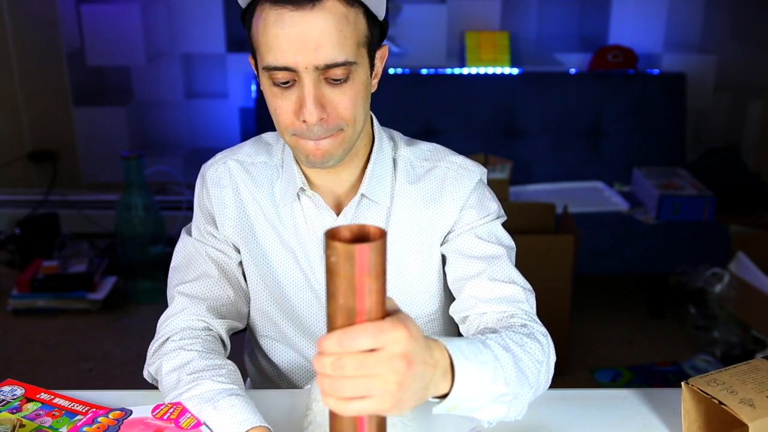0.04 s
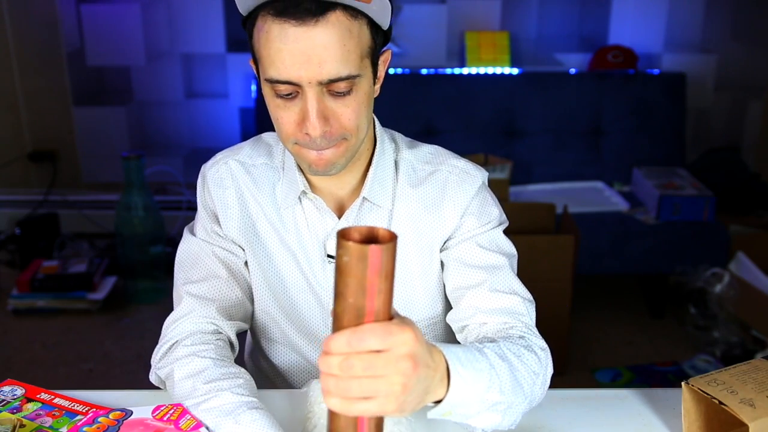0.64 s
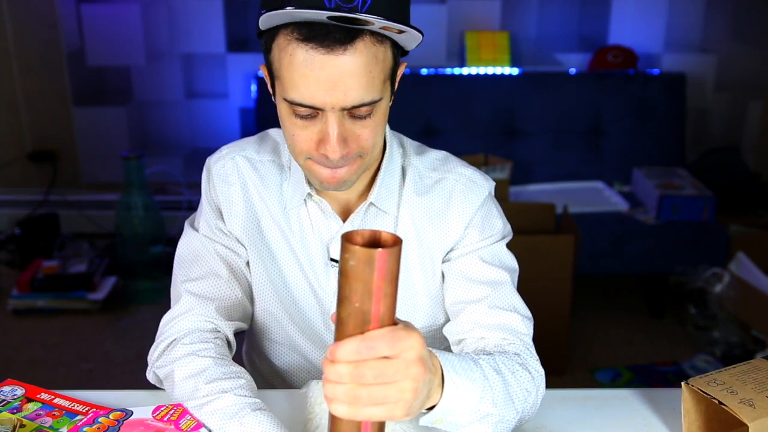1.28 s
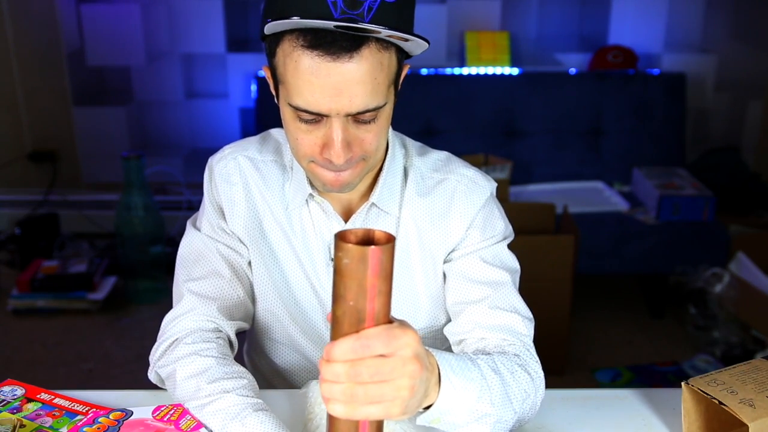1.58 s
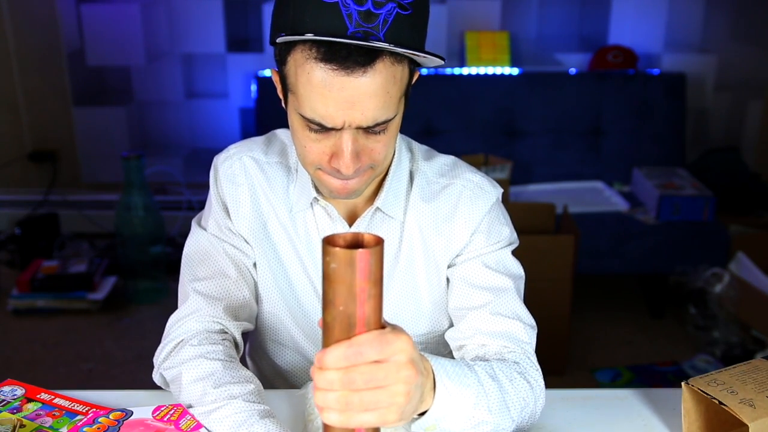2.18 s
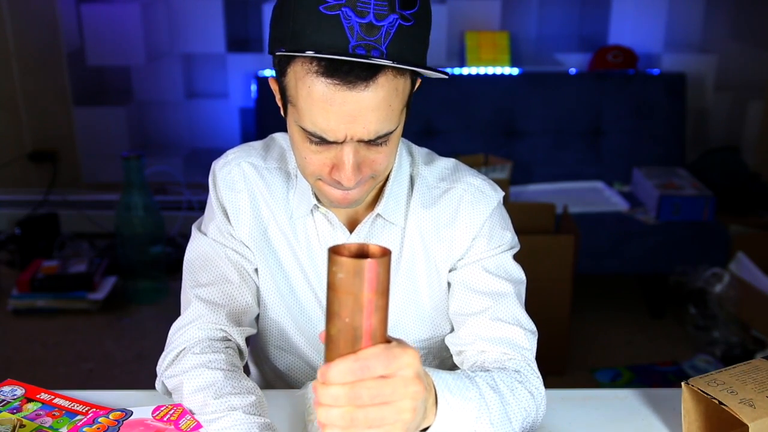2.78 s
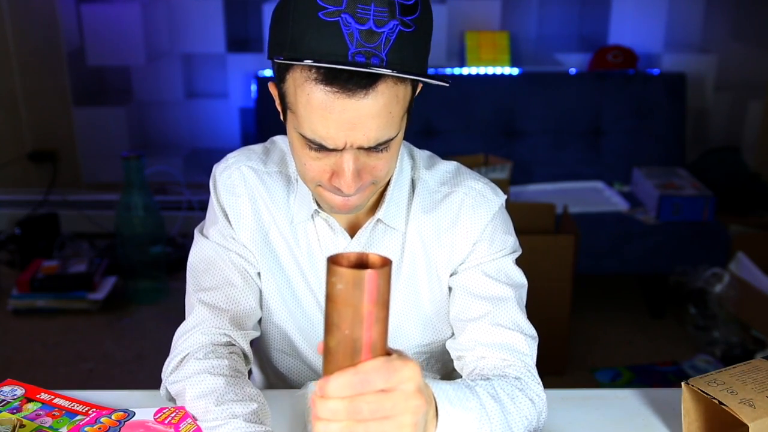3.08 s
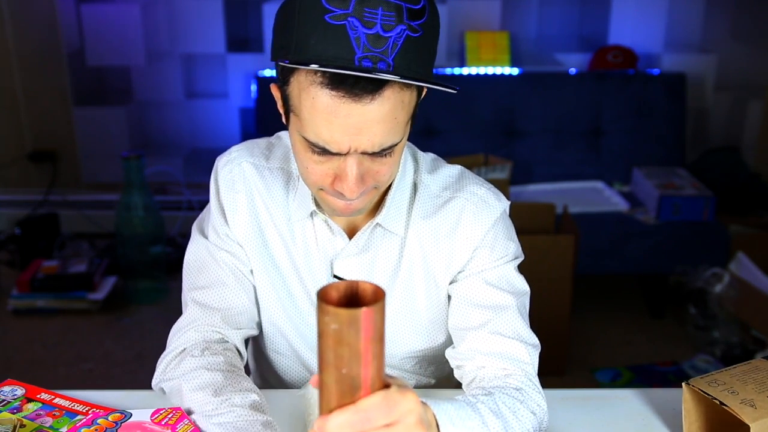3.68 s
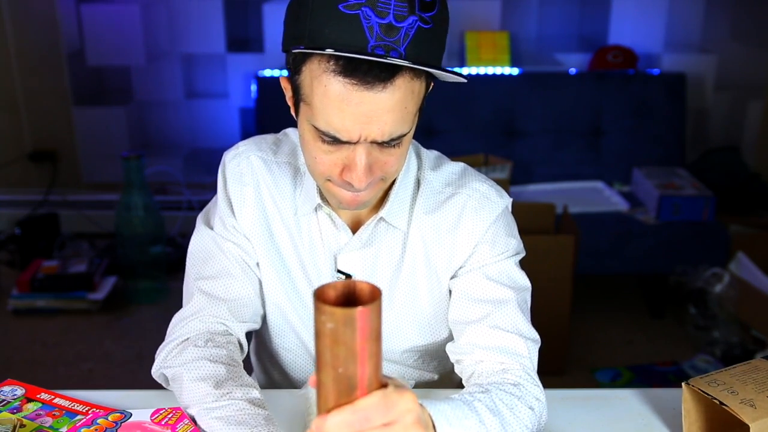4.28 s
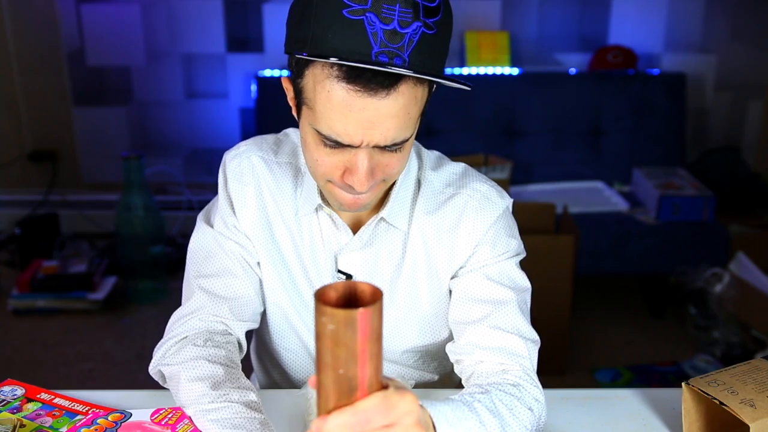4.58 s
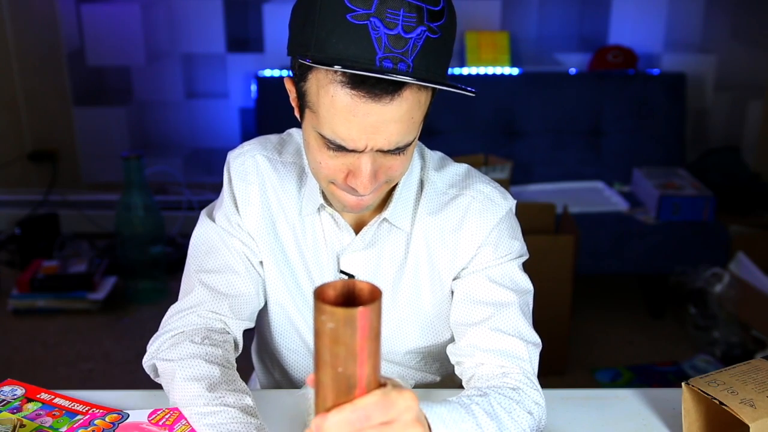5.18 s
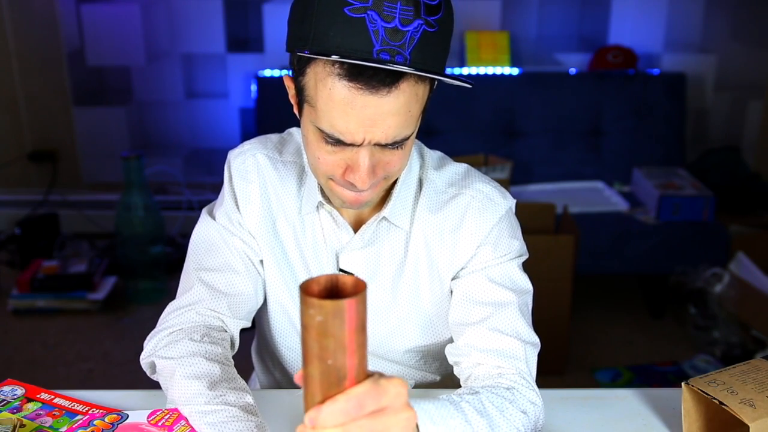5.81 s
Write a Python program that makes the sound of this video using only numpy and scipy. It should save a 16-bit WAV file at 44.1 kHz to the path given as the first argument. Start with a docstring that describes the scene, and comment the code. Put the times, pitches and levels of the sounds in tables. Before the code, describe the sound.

Right at the start, magnets clink against a copper tube and bump the table with a brief hollow note. Light finger ticks and knocks follow, with short rim scrapes and a sleeve brushing the tabletop around 0.6 seconds. Faint ticks thin out until a small scrape, knocks and ticks at about 2.2 seconds. From 2.5 seconds a hand slides softly down the tube in surges. Just after 3.2 seconds the magnets clink again and slam onto the table with a sharp clack and heavy thump, the loudest moment, quickly rocking to rest. A bright tick and sleeve rustle come near 3.75 seconds. From 3.9 to 4.4 seconds the tilting rim creaks, scrapes and knocks. Soft knocks and sleeve strokes die away by 6 seconds. Everything is close to one microphone in a small furnished room, with short reverberation, faint finger rubbing and quiet ventilation.

```python
"""Strong magnets clink on an upright, hand-held copper tube and bump the table, close to one microphone.
Fingers tick and knock, the rim scrapes, sleeves brush the tabletop, and a sleeve slides along the table in
surges. Just after 3.2 s the magnets clink again, slam onto the table and rock to rest. The grip then creaks on
the tube, the rim scrapes as it tilts, and the last soft knocks and sleeve strokes die away. Throughout, the
gripping fingers fidget over faint ventilation, and a small furnished room answers each contact."""
import sys
import numpy as np
from scipy import signal
from scipy.fft import rfft, irfft, next_fast_len
from scipy.io import wavfile
from scipy.ndimage import uniform_filter1d

SR = 44100
rng = np.random.default_rng(int(sys.argv[2]) if len(sys.argv) > 2 else 0)


def dump_mix(stems):
    """Bounce the given channels to the path in sys.argv[1] as a 16-bit WAV at rate SR."""
    frames = np.atleast_2d(stems).T  # one column per channel
    limited = np.clip(frames, -1, 1)  # hard clip at full scale
    pcm = np.round(limited * 32767).astype(np.int16)
    wavfile.write(sys.argv[1], SR, pcm)


N = 266805
T = np.arange(SR // 2) / SR  # time since a contact [s]

# modes of the tube wall: (frequency [Hz], relative level [dB], t60 [s])
COPPER_MODES = [(1750, -10, .07), (2310, -11, .08), (2365, -19, .28), (2660, -10, .11), (2900, -17, .1),
                (3160, -13, .06), (3960, 0, .035), (4037, -11, .09), (4472, -7, .06), (5050, -12, .06),
                (5440, -7, .035), (5640, -13, .04), (6420, -10, .035), (6660, -10, .035), (7150, -14, .03),
                (8090, -8, .05), (8460, -8, .035), (8730, -12, .03), (9470, -13, .035), (10800, -14, .035),
                (11300, -18, .03), (11820, -18, .05), (12420, -14, .03), (12800, -19, .03),
                (13400, -19, .04), (13900, -19, .03)]


def amp(db):
    """Decibels to gain."""
    return 10 ** (np.asarray(db) / 20)


def unit(x):
    """Scale to rms 1."""
    return x / np.sqrt(np.mean(x ** 2) + 1e-20)


def along(points, hz):
    """Read a curve of (frequency [Hz], value) points on a log frequency axis."""
    freqs, values = np.transpose(points)
    return np.interp(np.log(hz + 1), np.log(freqs + 1), values)


def filtered(x, response):
    """Filter x by a response given as a function of frequency."""
    size = next_fast_len(len(x) + 8192)
    return irfft(rfft(x, size) * response(np.fft.rfftfreq(size, 1 / SR)), size)[:len(x)]


def coloured(x, spectrum, scale=1):
    """Shape x with an EQ curve, shifted in pitch by scale; the result has rms 1."""
    return unit(filtered(x, lambda hz: amp(along(spectrum, hz / scale))))


def grains(size, share):
    """Friction grain: in a small share of all samples a tiny catch lets go."""
    return rng.standard_normal(size) * (rng.random(size) < share)


def fade(t60, hold=0):
    """Steady for hold seconds, then dying by 60 dB in t60."""
    return np.exp(-np.log(1000) * np.maximum(T - hold, 0) / t60)


def rise(seconds):
    """A soft attack with this time constant."""
    return 1 - np.exp(-T / seconds)


def tone(hz, t60):
    """One struck resonance."""
    return np.sin(2 * np.pi * hz * T) * fade(t60)


def ring(modes, scatter_db, hold=0):
    """Struck modes, starting at rms 1; every contact point feeds them a little differently."""
    hz, db, t60 = np.transpose(modes)
    gain = amp(db + scatter_db * rng.standard_normal(len(hz)))
    waves = np.sin(2 * np.pi * (hz[:, None] * T + rng.random((len(hz), 1))))
    return gain @ (waves * fade(t60[:, None], hold)) / np.sqrt(np.sum(gain ** 2) / 2)


def burst(centre_hz, q, t60):
    """A brief contact: noise through the same broad band-pass twice."""
    def band(hz):
        damping = 1j * hz * centre_hz / q
        return damping / (centre_hz ** 2 - hz ** 2 + damping)
    return unit(filtered(rng.standard_normal(len(T)), lambda hz: band(hz) ** 2)) * fade(t60)


def add(track, s, sound):
    """Mix a sound in at s seconds."""
    part = track[round(s * SR):][:len(sound)]
    part += sound[:len(part)]


def in_room(sound, wet_db):
    """A contact plus the room's short, diffuse tail; the top treble dies first."""
    # reverb decay: (frequency [Hz], t60 [s])
    decay = [(100, .36), (400, 0.23), (1500, 0.33), (4000, 0.34), (8000, 0.29), (15000, 0.14)]
    hz, t, spectra = signal.stft(rng.standard_normal(len(T)), SR, nperseg=256)
    dying = spectra * np.exp(-np.log(1000) * t / along(decay, hz)[:, None])
    tail = signal.istft(dying, SR, nperseg=256)[1][:len(T)] * rise(0.0013)
    return sound + amp(wet_db) * signal.fftconvolve(sound, tail / np.linalg.norm(tail))[:len(sound)]


def room_tone():
    """A quiet bed of ventilation noise and microphone hiss."""
    # colour of the bed: (frequency [Hz], relative level [dB])
    air_eq = [(20, -12), (45, -1), (120, 0), (250, -5.5), (520, -2.5), (620, -12.5), (810, -7), (1050, -15),
              (1600, -19), (2400, -23.5), (6000, -26), (12000, -27), (15800, -36.5)]
    return amp(-63) * coloured(rng.standard_normal(N), air_eq)


def friction(drive, rub_db, hiss_db):
    """Sliding contact: a grainy rub through the table, a scratchy hiss of threads, a faint copper ring."""
    # dull body of the rub: (frequency [Hz], relative level [dB])
    rub_eq = [(40, -2.5), (110, -1.5), (220, 0), (420, 2), (800, -2), (1300, -10), (2000, -16), (3500, -34),
              (9000, -41)]
    # bright hiss of the threads: (frequency [Hz], relative level [dB])
    hiss_eq = [(900, -2), (1900, 4), (2700, -3), (3800, 0), (4600, -1.5), (8000, -1), (12000, -4.5),
               (15500, -9.5)]
    snags_per_s, snag_db, wall_db = 61, -13, -78.5
    size = len(drive)
    rub = coloured(grains(size, share=.08), rub_eq)
    catching = amp(1.5 * unit(uniform_filter1d(rng.standard_normal(size), size=150)))
    snags = unit(grains(size, share=snags_per_s / SR))  # threads that catch and let go
    threads = unit(grains(size, share=0.41) * catching)
    hiss = coloured(threads + amp(snag_db) * snags, hiss_eq)
    wall = unit(signal.fftconvolve(hiss, ring(COPPER_MODES, scatter_db=1.5))[:size])
    return drive * (amp(rub_db) * rub + amp(hiss_db) * hiss + amp(wall_db) * wall)


def fidgets():
    """The grip is never quite still: faint, short finger strokes at chance moments."""
    strokes_per_s, length_s = 13, .1
    speed = np.zeros(N)
    swell = np.hanning(round(length_s * SR))
    for k, (delay, strength) in enumerate(rng.random((int(strokes_per_s * N / SR), 2))):
        add(speed, (k + delay) / strokes_per_s, strength * swell)
    return friction(speed, rub_db=-62.5, hiss_db=-77.5)


def sleeves():
    """Sleeve and skin brush the table; each stroke swells and dies with the speed of the arm."""
    # arm strokes: (midpoint [s], length [s], rub level [dB], hiss level [dB])
    strokes = [(0.616, .33, -48, -50), (.843, .15, -53.5, -62), (1.083, .3, -62.5, -79.5),
               (2.065, 0.12, -58.5, -63), (2.219, 0.13, -49, -59.5), (2.396, .16, -52, -61),
               (3.697, 0.38, -50.5, -50), (3.816, .3, -51, -64), (4.251, .16, -47.5, -54),
               (4.363, .12, -55, -64), (4.488, 0.081, -54, -88), (4.96, 0.22, -55.5, -71),
               (5.486, 0.13, -55, -69.5), (5.747, 0.087, -62.5, -65.5), (5.906, .08, -70, -70.5)]
    out = np.zeros(N)
    for s, length, rub_db, hiss_db in strokes:
        speed = np.hanning(round(length * SR))
        add(out, s - length / 2, friction(speed, rub_db, hiss_db))
    return out


def sleeve_slide():
    """A sleeve slides along the table in surges as the elbow moves; rub and hiss both follow its pressure."""
    # pressure of the sleeve: (time [s], relative level [dB])
    surges = [(2.48, -16), (2.58, -3), (2.67, -6.5), (2.74, -2), (2.84, -7), (2.92, 0.5), (2.985, -6),
              (3.025, 1.5), (3.129, -3.5), (3.198, -9)]
    out = np.zeros(N)
    s, pressure_db = np.transpose(surges)
    pressure = amp(np.interp(np.arange(s[0], s[-1], 1 / SR), s, pressure_db))
    add(out, s[0], friction(pressure, rub_db=-52.5, hiss_db=-62))
    return out


def rim_scrapes():
    """The rim sticks and slips over the table at an uneven rate; every slip is a short rasp."""
    # drags of the rim: (time [s], hold [s], level [dB], pitch scale [ratio])
    drags = [(0.56, 0.029, -42, 1), (0.623, 0.014, -42, .85), (0.687, 0.014, -41.5, 1),
             (2.174, .069, -47, .7), (4.185, 0.013, -48.5, 1), (4.258, 0.022, -32, 1.0),
             (4.288, 0.034, -44, .7), (4.342, 0.028, -47, .85)]
    # colour of the rasp: (frequency [Hz], relative level [dB])
    grind_eq = [(60, -38), (200, -14.5), (500, 0), (850, -3.5), (1300, -9), (1950, -14.5), (2350, -26),
                (6000, -36.5), (15000, -49)]
    slips_per_s, bite_s = 190, 0.003  # slip rate at a pitch scale of 1
    out = np.zeros(N)
    for s, hold, db, scale in drags:
        unevenness = unit(uniform_filter1d(rng.standard_normal(len(T)), size=300))
        slip_phase = np.cumsum(slips_per_s * scale * np.exp(0.28 * unevenness)) / SR % 1
        rasp = coloured(rng.standard_normal(len(T)) * np.exp(-1.5 * slip_phase), grind_eq, scale)
        add(out, s, amp(db) * in_room(rasp * rise(bite_s) * fade(0.047, hold), wet_db=-6))
    return out


def ticks():
    """Magnets and fingernails touch down hard: tiny, bright bursts of noise."""
    # hard touches: (time [s], level [dB], pitch [Hz])
    touches = [(.239, -44, 1720), (0.6943, -37.5, 4600), (0.7, -35, 6900), (0.7764, -51, 5600),
               (0.9539, -48.5, 1640), (0.994, -49, 2250), (1.2188, -54.5, 2090), (1.3446, -52.5, 2080),
               (1.6323, -67, 1890), (2.355, -35.5, 5270), (2.3856, -40, 7440), (2.9235, -42, 2170),
               (3.1677, -54.5, 2530), (3.503, -48.5, 3460), (3.756, -31, 5000)]
    out = np.zeros(N)
    for s, db, hz in touches:
        add(out, s, amp(db) * in_room(burst(hz, q=.6, t60=.014), wet_db=-13.5))
    return out


def knocks_and_creaks():
    """Soft knocks of rim and fingers, and the creak of the grip slipping on the tube: a few hollow cycles each."""
    # soft knocks: (time [s], level [dB], pitch [Hz])
    knocks = [(.2396, -38.5, 756), (.4715, -34, 405), (.695, -33, 756), (1.2189, -43, 820),
              (2.181, -33.5, 496), (2.355, -40.5, 618), (4.1193, -34, 600), (4.3, -25, 586),
              (4.354, -34.5, 748), (4.5648, -37, 610), (4.8192, -38.5, 694), (5.0322, -37.5, 619)]
    # single slips of the creak, all at one level and pitch: (time [s])
    slips = [3.9377, 3.9866, 4.006, 4.0306, 4.076, 4.1715]
    creak_db, creak_hz = -39, 680
    table_dulling = signal.butter(4, 2060, fs=SR, output="sos")  # the table's response falls away near 2 kHz, dulling the top end
    out = np.zeros(N)
    for s, db, hz in list(knocks) + [(s, creak_db, creak_hz) for s in slips]:
        overtone_hz = hz * rng.uniform(1.4, 2.1)
        hollow = tone(hz, t60=.017) + amp(-6) * tone(overtone_hz, t60=.01)
        knock = (hollow + amp(-12) * burst(hz, q=0.37, t60=0.026)) * rise(0.00032)
        add(out, s, amp(db) * in_room(signal.sosfilt(table_dulling, knock), wet_db=-5))
    return out


def booms():
    """The air in the tube or, lower, the tabletop sounds a hollow note until the hand damps it."""
    # hollow notes: (time [s], level [dB], pitch [Hz])
    notes = [(0.0536, -29.5, 512), (.072, -31, 410), (0.241, -44, 199), (.846, -50.5, 417),
             (3.503, -46.5, 429), (3.768, -41, 212), (4.125, -40.5, 431), (5.641, -48.5, 88.5)]
    out = np.zeros(N)
    for s, db, hz in notes:
        note = np.sqrt(2) * tone(hz, t60=0.12) * rise(0.0005)
        add(out, s, amp(db) * in_room(note, wet_db=-3.5))
    return out


def magnet_clinks():
    """A magnet chatters against the copper wall for a few ms; the hand keeps the ring short."""
    # hits on the wall: (time [s], level [dB], chatter length [s])
    hits = [(0.055, -32, 0.001), (.057, -22.5, .0025), (0.0917, -30, 0.009), (0.0949, -31, .005),
            (3.2231, -32.5, .002), (3.2244, -24.5, .002), (3.235, -35.5, 0.0023), (3.2482, -37, .004)]
    # colour of the chatter: (frequency [Hz], relative level [dB])
    grit_eq = [(300, 1.5), (1300, 0.5), (6000, -5.0), (10000, -7.5), (15500, -15.0)]
    out = np.zeros(N)
    for s, db, length in hits:
        grit = coloured(rng.standard_normal(len(T)), grit_eq) * fade(0.017, hold=length)
        clink = ring(COPPER_MODES, scatter_db=1.5, hold=length / 2) + amp(-6) * grit
        add(out, s, amp(db) * in_room(clink * rise(0.00069), wet_db=-14))
    return out


def thump(pitch_hz, width_s, peak_s):
    """The whole tabletop gives way and springs back in one heavy swing."""
    t = T - peak_s
    return np.cos(2 * np.pi * pitch_hz * t) * np.exp(-(t / width_s) ** 2)


def table_blows():
    """The magnets crack on the surface, ring the board and thump the whole top, then rock to rest."""
    # blows, before the trims below: (time [s], board level [dB], crack level [dB])
    blows = [(.0537, -31.5, -32), (.071, -34.5, -50), (.094, -33, -38), (3.227, -28, -43),
             (3.238, -17, -21.5), (3.2481, -14.5, -13.5), (3.262, -20, -26.5), (3.284, -15.5, -35)]
    # modes of the tabletop: (frequency [Hz], relative level [dB], t60 [s])
    board_modes = [(141, -8, .26), (172, -7, .16), (223, -3, .14), (243, -4, .14), (279, -1, .16),
                   (352, 0, .17), (386, -2, .11), (437, -2, .14), (510, -6, .11), (657, -9, .1),
                   (757, -5, .09), (793, -5, .1), (822, -7, .13), (947, -6, .12), (1172, -10, .08),
                   (1463, -14, .09), (1905, -14, .06), (2026, -13, .07)]
    # dull thud in the board: (frequency [Hz], relative level [dB])
    thud_eq = [(60, -20), (210, -1), (400, 0), (900, -8), (2000, -19), (9000, -40)]
    # sharp crack of the surface: (frequency [Hz], relative level [dB])
    crack_eq = [(100, -33.5), (500, 4.5), (1200, 9), (2000, -1.5), (3300, -2), (5000, -11), (8000, -10),
                (15000, -29.5)]
    board_trim_db, crack_trim_db, thump_trim_db = -2, 5, -9
    rock_gap_s, board_loss_db, crack_loss_db = 0.026, 13.5, 6.5  # per rocking contact
    slam_s, slam_db = 3.2488, -8.5  # the full weight of the magnets lands
    lead_s = 0.02  # a thump starts early so that it peaks on the contact
    contacts = list(blows)
    for _ in range(2):  # rocking after the last blow
        s, board_db, crack_db = contacts[-1]
        contacts.append((s + rock_gap_s, board_db - board_loss_db, crack_db - crack_loss_db))
    out = np.zeros(N)
    for s, board_db, crack_db in contacts:
        board = ring(board_modes, scatter_db=1.5)
        thud = coloured(rng.standard_normal(len(T)), thud_eq) * fade(.055)
        crack = coloured(rng.standard_normal(len(T)), crack_eq) * fade(.018)
        blow = amp(board_db + board_trim_db) * (board + thud) + amp(crack_db + crack_trim_db) * crack
        add(out, s, in_room(blow * rise(0.00013), wet_db=-7))
    swing = thump(pitch_hz=121, width_s=0.0062, peak_s=lead_s)
    pushes = [(s, board_db + thump_trim_db) for s, board_db, _ in contacts]
    for s, db in pushes + [(slam_s, slam_db)]:
        add(out, s - lead_s, amp(db) * in_room(swing, wet_db=-12))
    return out


def scene():
    """Impacts and rubbing over the quiet bed, in mono."""
    impacts = magnet_clinks() + table_blows() + booms() + ticks() + knocks_and_creaks()
    rubbing = rim_scrapes() + sleeves() + sleeve_slide()
    bed = room_tone() + fidgets()
    return (impacts + rubbing + bed)[None]


def record(dry):
    """The microphone rolls off the deepest bass, and the very top end is cut away."""
    low_cut_hz, top_hz = 42, 15830
    response = lambda hz: (hz < top_hz) * hz ** 2 / np.hypot(hz ** 2, low_cut_hz ** 2)
    return np.array([filtered(channel, response) for channel in dry])


dry = scene()
out = record(dry)
dump_mix(out)
```